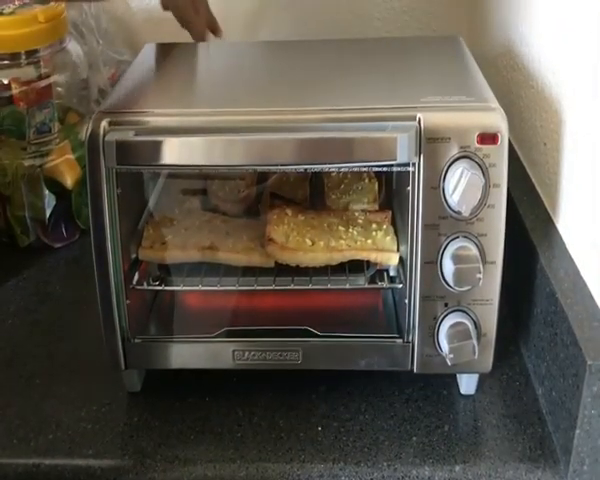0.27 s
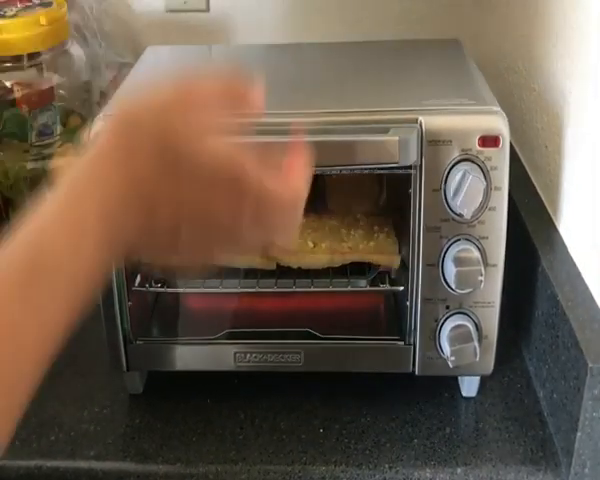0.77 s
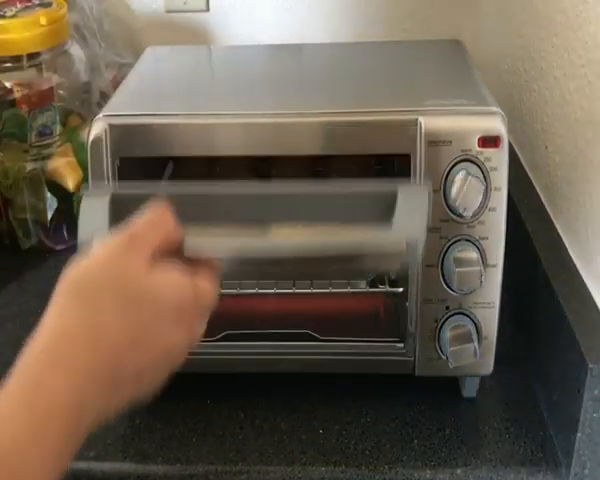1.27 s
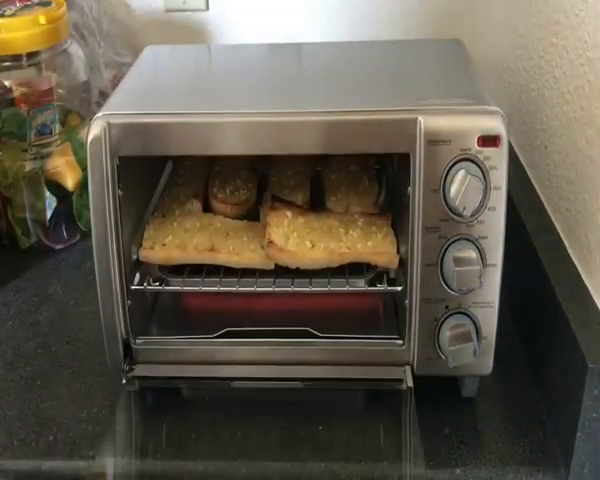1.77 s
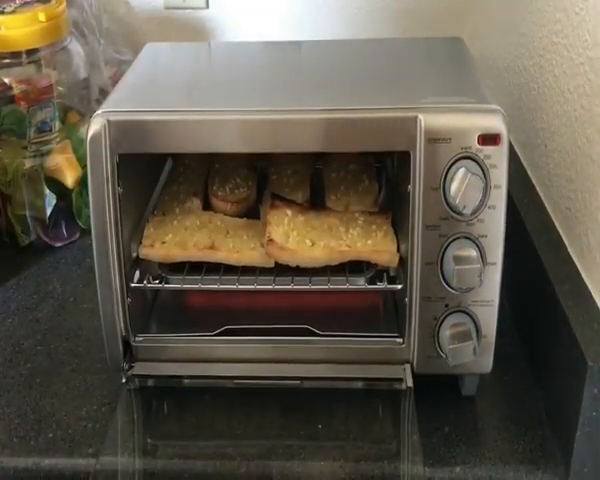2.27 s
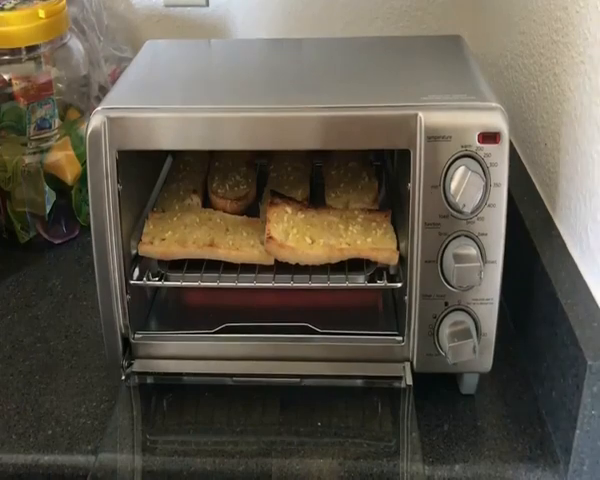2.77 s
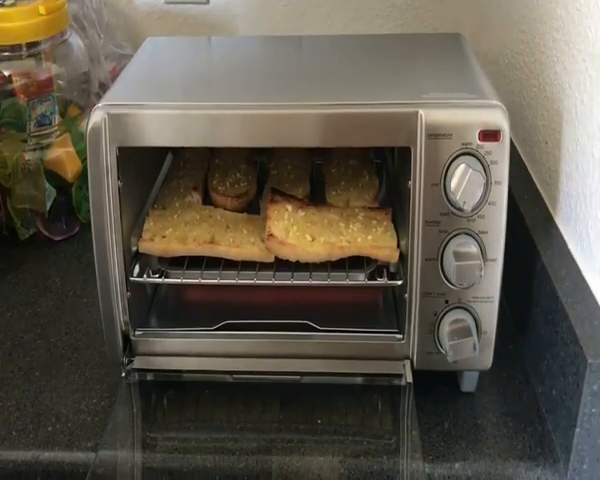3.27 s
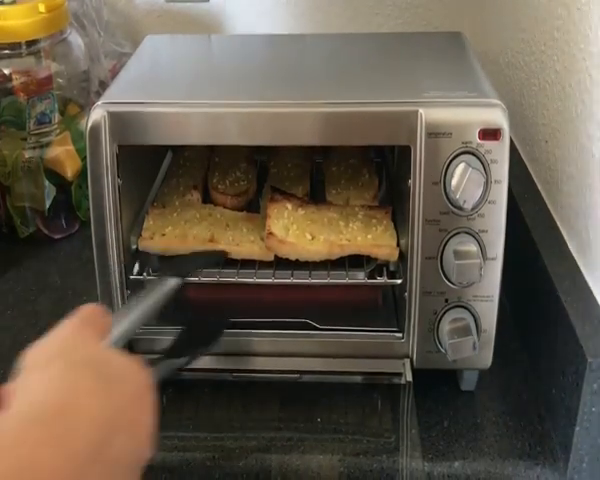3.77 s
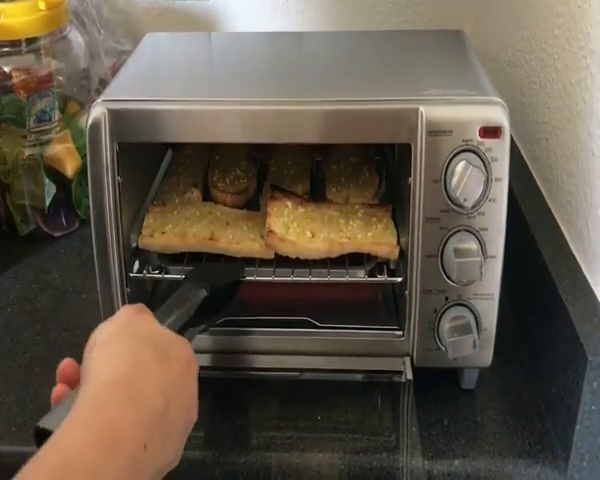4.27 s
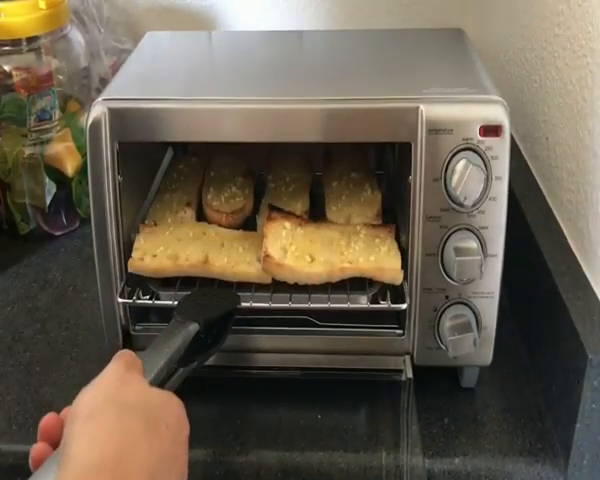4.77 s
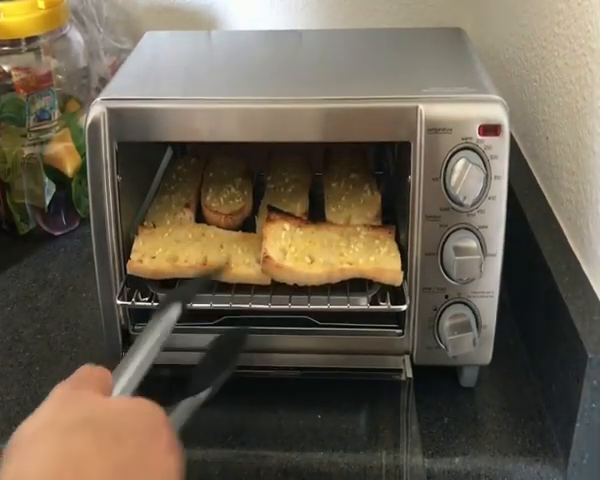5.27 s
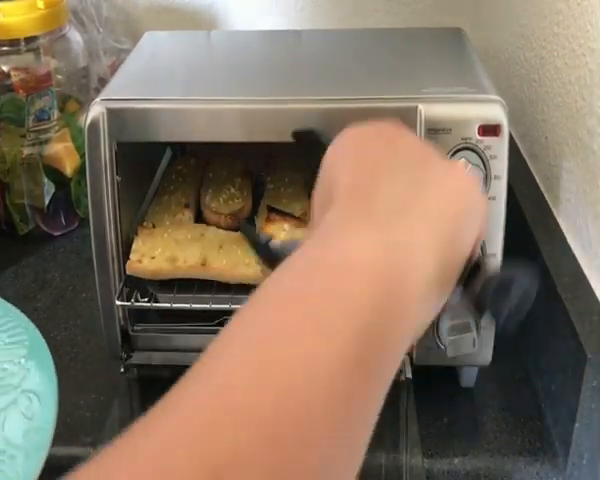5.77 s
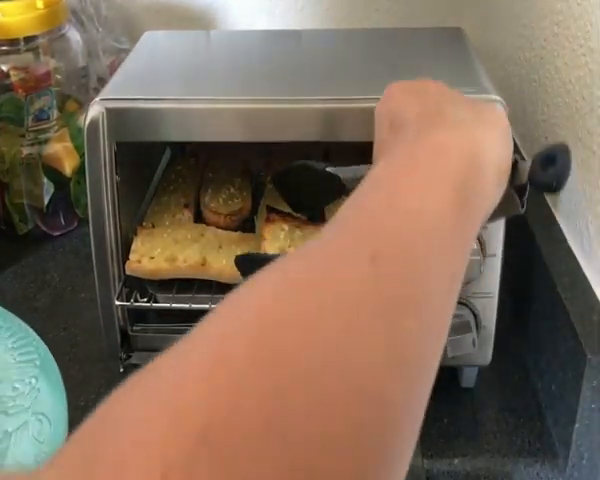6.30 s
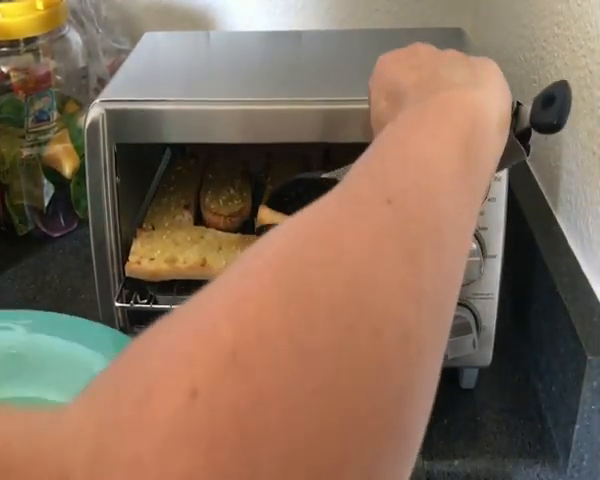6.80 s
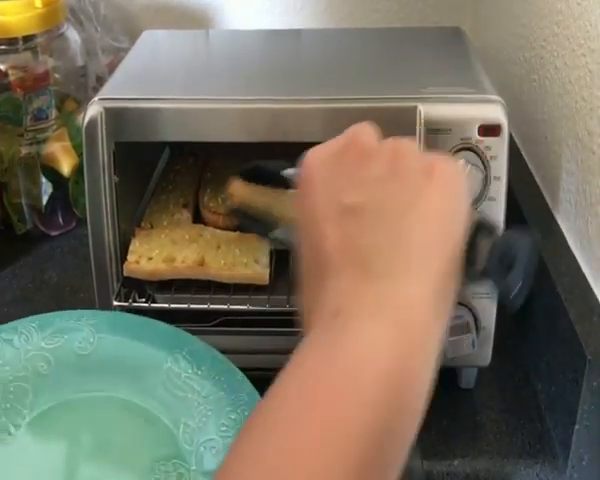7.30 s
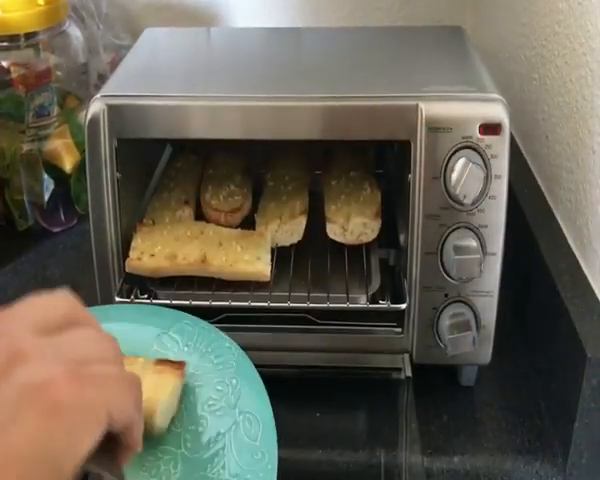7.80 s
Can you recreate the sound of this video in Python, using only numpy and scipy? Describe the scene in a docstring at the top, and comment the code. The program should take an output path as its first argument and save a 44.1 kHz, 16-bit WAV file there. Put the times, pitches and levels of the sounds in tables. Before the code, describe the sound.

A small kitchen is heard closely, almost mono, with a short room tail and a steady low motor hum under faint hiss. At 0-0.15 s there are light metallic clicks and a soft low counter bump. At about 0.57-0.64 s a hard hollow object drops on the counter: a very loud woody clack with rapid bounces, and a faint last tap at 0.84. Faint handling follows; from 1.85 to 2.25 the metal oven door hits its stops, clanking sharply at 1.9 and again at 2.05, with juddering rattle. Around 2.8-2.95 a dish grates off its stack, then knocks dully at 3.13. Small dry ticks come at 3.4-3.8. At 4.35-5.0 tongs click, grip and drag the ringing wire rack. At 6.6-6.9 crust scrapes with metal clicks, then faint ticks. Near 7.8 and 7.98 the plate clinks, the second brighter and louder, with light taps and a faint slide after.

```python
"""Quiet kitchen: a hard object drops on the counter; an oven door swings down and bounces on its stops.
A dish is dragged off its stack; tongs grip and drag a wire rack, scrape toast off it and tap a glazed plate.
Blows are noise bursts, slides are gritty noise under pressure curves; both drive banks of resonances.
Plate and gripped rack are sums of decaying sines. A decaying-noise room answers; an appliance drones."""
import sys
import numpy as np
from scipy import signal
from scipy.fft import rfft, irfft, next_fast_len
from scipy.io import wavfile

SR = 44100
rng = np.random.default_rng(int(sys.argv[2]) if len(sys.argv) > 2 else 0)


def natural_amplitude(level_db):
    """Convert a level in decibels to a linear amplitude factor, elementwise."""
    exponent = np.asarray(level_db, float) / 20
    return 10 ** exponent


def store_pcm(level_fs):
    """Save levels as 16-bit WAV."""
    pcm = np.round(np.clip(level_fs, -1, 1) * 32767).astype(np.int16)
    wavfile.write(sys.argv[1], SR, np.atleast_2d(pcm).T)


N = 354828


def unit(x):
    """Scales to rms 1."""
    return x / np.sqrt(np.mean(x ** 2) + 1e-20)


def along(points, hz):
    """Interpolates (f/Hz, value) points on a log-frequency axis."""
    f, value = np.transpose(points)
    return np.interp(np.log(hz + 1), np.log(f + 1), value)


def curves(rows):
    """One gain per sample for each dB column; -150 dB outside the rows."""
    s, *columns = np.transpose(rows)
    t = np.arange(N) / SR
    return np.array([natural_amplitude(np.interp(t, s, db, -150, -150)) for db in columns])


def filtered(x, response):
    """Multiplies the spectrum of x by a function of frequency."""
    size = next_fast_len(N + SR // 2)
    spectrum = rfft(x, size) * response(np.fft.rfftfreq(size, 1 / SR))
    return irfft(spectrum, size)[..., :N]


def passed(x, hz, kind, order=4):
    """Butterworth low- or high-pass."""
    return signal.sosfilt(signal.butter(order, hz, kind, fs=SR, output="sos"), x)


def coloured(spectrum):
    """Noise of rms 1 with a given spectrum."""
    return unit(filtered(rng.standard_normal(N), lambda hz: natural_amplitude(along(spectrum, hz))))


def resonate(x, peaks):
    """Parallel resonances of alternating sign, scaled so that white noise about keeps its level."""
    out, power = 0, 0
    for k, (hz, width_hz, db) in enumerate(peaks):
        b, a = signal.iirpeak(hz, hz / width_hz, SR)
        out = out + (-1) ** k * natural_amplitude(db) * signal.lfilter(b, a, x)
        power += natural_amplitude(db) ** 2 * np.pi * width_hz / SR
    return out / np.sqrt(power)


def add(track, s, sound):
    """Mixes a sound into the track at s seconds."""
    part = track[..., round(s * SR):][..., :sound.shape[-1]]
    part += sound[..., :part.shape[-1]]


def ring(modes, top_hz, scatter_db):
    """Decaying modes, peak 1: soft blows rise slowly and miss high modes, hard ones miss low modes."""
    hz, db, t60_s = np.transpose(modes)[:, :, None]
    t = np.arange(SR // 3) / SR
    missed_db = 10 * np.log10(1 + (hz / top_hz) ** 24 + (top_hz / hz / 5) ** 2)
    db = db + scatter_db * rng.standard_normal(db.shape) - missed_db
    decay = natural_amplitude(db - 60 * t / np.maximum(t60_s, .01))
    x = np.sum(decay * np.sin(2 * np.pi * hz * t), axis=0)
    x = x * (1 - np.exp(-t * top_hz))
    return x / abs(x).max()


def burst(t60_s, crack):
    """First touch as one push, a short crackle and a rattle that dies after it."""
    t = np.arange(SR // 4) / SR
    rattle = natural_amplitude(-60 * t / max(t60_s, .005))
    crackle = crack * natural_amplitude(-60 * t / 0.0053)
    x = rng.standard_normal(len(t)) * (rattle + crackle)
    x[0] = 6 * crack
    return x


def metal_blow(db):
    """Metal blow: lighter ones start softer and rattle longer; the level itself is set by the caller."""
    t60_at_0db_s, t60_s_per_db = .06, .0005
    crisp_db, softens_per_db, rise_s = -24, .06, .0015
    blow = burst(t60_at_0db_s - t60_s_per_db * db, crack=0.95)
    t = np.arange(len(blow)) / SR
    softness = np.clip(softens_per_db * (crisp_db - db), 0, .7)
    return blow * (1 - softness * np.exp(-t / rise_s))


def strokes(rows, mix):
    """Pressure rises to its hardest moment and lets go; returns drives of bars, wires, box and fine hiss."""
    edge_db, fade_s = 17, .04  # start and end under the hardest moment; fade outside the stroke
    treble_grows = 1.3  # treble dB per pressure dB
    t, out = np.arange(0, N, 32) / SR, 0
    box_db, hiss_db = mix
    for start, hardest, end, db, bright_db in rows:
        times = [start - fade_s, start, hardest, end, end + fade_s]
        shape_db = np.interp(t, times, edge_db * np.array([-4, -1, 0, -1, -4]))
        treble_db = bright_db + treble_grows * shape_db
        drives_db = np.array([shape_db, treble_db, box_db + shape_db, hiss_db + treble_db])
        out = out + natural_amplitude(db + drives_db)
    return out.repeat(32, axis=1)[:, :N]


def catching(hold, power):
    """Random strength held for a number of samples: sliding catches and lets go."""
    return rng.exponential(size=N // hold + 1).repeat(hold)[:N] ** power


# landing and bounces [t/s, level/dB, rattle re landing/dB]
LANDINGS = [(.568, -23, -22), (.584, -1, -39), (.593, -10, -30), (.601, -8, -13.5), (.615, -11.5, -28),
            (.638, -18, -23), (0.839, -33, -35)]
# hollow body [f/Hz, width/Hz, level/dB]
DROPPED_BODY = [(132, 18, -3), (258, 26, -3), (297, 28, -3), (360, 26, -4), (551.3, 40, -4),
                (675, 60, -1.5), (870, 64, 2), (975, 70, -2), (1050, 70, -1), (1300, 120, 1), (1387, 40, 9),
                (1620, 200, -4), (1880, 100, -4), (2080, 140, -9)]


def drop():
    """Each landing shakes the hollow body: hard touch, duller chatter, loose parts rattling on top."""
    chatter_t60_at_0db_s, chatter_s_per_db = .05, .0015  # softer landings chatter longer
    touch, chatter, rattle = np.zeros((3, N))
    for s, db, rattle_db in LANDINGS:
        chatter_t60_s = chatter_t60_at_0db_s - chatter_s_per_db * db
        add(touch, s, natural_amplitude(db + 3.5) * burst(0.0089, crack=.6))
        add(chatter, s, natural_amplitude(db - 12.5) * burst(chatter_t60_s, crack=0))
        add(rattle, s, natural_amplitude(db + rattle_db + 3.5) * burst(0.055, crack=.6))
    body = resonate(touch + passed(chatter, 1300, "low", order=1), DROPPED_BODY)
    loose = resonate(rattle, [(2900, 1200, -2), (7000, 4000, -11), (13300, 2600, -17)])
    return passed(body, 2600, "low", order=3) + passed(loose, 1500, "high")


# door on its stops [t/s, level/dB, tick re level/dB, thump re level/dB]
STOP_HITS = [(1.852, -47, -2, 5), (1.89, -33, -5, -8), (1.8953, -15, -7, -10), (1.906, -26, -4, -3),
             (1.9556, -39, 9, 8), (2.023, -53, 12, -6), (2.0479, -20, -8, -7), (2.1181, -44, 10, -8),
             (2.15, -32, -15, 0), (2.2192, -50, 1.5, 12.5)]


def door_stops(force, door):
    """Door bounces on its stops: each blow drives door frame, wires and box."""
    for s, db, tick_db, thump_db in STOP_HITS:
        blow = metal_blow(db)
        add(door, s, natural_amplitude(db - 7.5) * blow)
        add(force[1:], s, natural_amplitude([[db + tick_db - 4], [db + thump_db - 3.5]]) * blow)


# handling, tongs, rack [t/s, level/dB, tick re level/dB, thump re level/dB, ping f/Hz]
METAL_CONTACTS = [(0.0638, -42, -10, -3, 2480), (0.0765, -39.5, -14, -1, 2250),
                  (0.0957, -33, -12, -19, 3300), (1.5966, -46.5, -11, -3, 2920),
                  (1.6476, -42.5, -31.5, -8, 2670), (1.731, -44, -12, -21.5, 2190),
                  (4.3466, -48, -5.5, -1, 9000), (4.369, -34, -10, -8, 2800), (4.3782, -27, -11, -5, 3100),
                  (4.4094, -42, 1.5, 4, 2730), (4.9568, -50, -10, -8, 4000),
                  (6.6859, -36, -12.5, -11, 3100), (6.7032, -31, -10, -18, 3050), (6.7325, -38, 4, 8, 2520),
                  (6.748, -34, -6, 4, 2780)]


def metal_contacts(force, pings):
    """Metal on metal drives shell, wires and box; the touched spot has its own pitch."""
    for s, db, tick_db, thump_db, hz in METAL_CONTACTS:
        blow = metal_blow(db)
        add(force, s, natural_amplitude([[db - 6], [db + tick_db - 2.5], [db + thump_db - 3.5]]) * blow)
        add(pings, s, natural_amplitude(db - 8) * resonate(blow, [(hz, 400, 0)]))


# hot metal and crust [t/s, level/dB, treble re level/dB, ping f/Hz]
DRY_TICKS = [(3.418, -54, 4, 8500), (3.7062, -44, -9, 3050), (3.767, -44, -4.5, 3260),
             (6.8824, -48, 4, 5400), (6.9679, -49, 1.5, 5000), (7.0299, -46, -6.5, 3090),
             (7.1566, -43, -4, 3220)]


def dry_ticks(force, pings):
    """Dry ticks of hot metal and crust: short bursts into shell and wires, plus a ping."""
    for s, db, treble_db, hz in DRY_TICKS:
        blow = burst(.03, crack=.6)
        add(force[:2], s, natural_amplitude([[db - 11], [db + treble_db - 4]]) * blow)
        add(pings, s, natural_amplitude(db - 8.5) * resonate(blow, [(hz, 500, 0)]))


# tongs close on the rack [t/s, peak/dB]
TONG_GRIPS = [(4.379, -27.5)]
# gripped rack [f/Hz, level/dB, t60/s]
RACK_MODES = [(1190, -1, .12), (1453, -3, 0.09), (2729, -4, .07), (3080, 4, .05)]


def grips(pings):
    """The gripped rack rings as decaying modes."""
    for s, db in TONG_GRIPS:
        add(pings, s, natural_amplitude(db) * ring(RACK_MODES, top_hz=5000, scatter_db=1.5))


# strokes, all [start t/s, hardest t/s, end t/s, pressure level/dB, wires re bars/dB]
# things handled on the counter
HAND_STROKES = [(0, .003, .045, -41, -14), (.02, .075, .15, -53, -16), (.7, .93, 1.1, -59, -5)]
# door swings down and judders
DOOR_STROKES = [(1.28, 1.42, 1.75, -58, -11), (1.5, 1.7, 1.95, -59, -5), (1.865, 1.896, 2.02, -46, 3),
                (1.9, 1.97, 2.22, -49, -6), (2.0, 2.13, 2.27, -55, 4)]
# dish slides off its stack
DISH_OFF_STACK = [(2.76, 2.86, 2.98, -56, 3)]
# tongs on the rack
TONG_STROKES = [(3.35, 3.42, 3.49, -63, -1.5), (4.355, 4.385, 4.48, -42, -12), (4.42, 4.51, 4.62, -56, -.6),
                (4.55, 4.66, 5.03, -45.5, -13), (6.725, 6.74, 6.83, -50, .6)]
# crust over wires and plate; from 6.85 s a faint bright hiss
CRUST_AND_HISS = [(6.62, 6.65, 6.7, -58, -6), (6.675, 6.7, 6.75, -45, -15), (6.71, 6.765, 6.88, -42, -3),
                  (6.85, 6.95, 7.3, -63, 1.5), (7.89, 7.96, 8.2, -58, 7)]


def sliding():
    """Gritty noise under pressure curves: four drives, and the share of crust and faint hiss in the bars."""
    # mix: (box re bars/dB, fine hiss re wires/dB)
    pressure = strokes(HAND_STROKES, (5, -6)) + strokes(DOOR_STROKES, (2.5, -6))
    pressure = pressure + strokes(DISH_OFF_STACK, (-1.5, -8)) + strokes(TONG_STROKES, (-1.5, 4))
    crust = strokes(CRUST_AND_HISS, (5, -7))
    total = pressure + crust
    drives = total * unit(catching(128, 0.38) * rng.standard_normal((4, N)))
    return drives, crust[0] / total[0]


# resonators, all [f/Hz, width/Hz, level/dB]
# oven shell
SHELL = [(1350, 490, -12), (2700, 800, -1), (3250, 600, -2), (4400, 1300, -7)]
# rubbed bars
RUBBED_BARS = [(740, 200, -1), (1420, 260, 3), (1800, 260, 2), (2520, 380, 0), (3100, 700, -4),
               (4300, 1600, -11)]
# door frame
FRAME = [(1270, 300, -9), (1950, 500, -11), (2380, 140, -2), (2570, 160, -2), (2760, 200, -2),
         (3310, 300, -2), (3800, 450, -6), (4330, 260, -5), (4570, 220, -7), (5440, 550, -5),
         (6090, 400, -5)]
# rack and tongs
WIRE_BANDS = [(6000, 1900, 20.5), (9200, 2600, 17.5), (12300, 4000, 11)]
# finest roughness of the sliding faces
FINE_GRIT = [(11430, 4300, -1.5), (13900, 3000, -0.5)]
# oven box and counter
BOX = [(151, 60, -0.5), (262, 97, 4.5), (398.4, 68, 1.5), (671, 250, -3)]


def oven():
    """Blows and sliding shake shell, wires and hollow box, each by its own amount."""
    force, pings, door = np.zeros((3, N)), np.zeros(N), np.zeros(N)  # force: shell, wires, box
    door_stops(force, door)
    metal_contacts(force, pings)
    dry_ticks(force, pings)
    grips(pings)
    (scrape, fizz, drag, hiss), crusty = sliding()
    # crust rasps the shell, the other strokes drag the bars
    shell = resonate(force[0] + crusty * scrape, SHELL)
    shell = shell + resonate((1 - crusty) * scrape, RUBBED_BARS) + resonate(door, FRAME)
    wires = resonate(force[1] + fizz, WIRE_BANDS)
    crumbs = catching(64, 1.3)  # single specks snap in the finest hiss
    fine = resonate(hiss * unit(1 + .35 * crumbs) + natural_amplitude(-13) * door, FINE_GRIT)
    box = resonate(force[2] + drag, BOX)
    out = pings + passed(shell, 600, "high") + passed(wires, 4200, "high", order=3)
    return out + passed(fine, 8500, "high") + passed(box, 1200, "low", order=2)


# drag stroke [start t/s, hardest t/s, end t/s, pressure level/dB, brightness/dB (not used here)]
DISH_STROKES = [(2.81, 2.868, 2.93, -42, 0)]
# catches [t/s, level/dB]
DISH_CATCHES = [(2.798, -52), (2.829, -45), (2.859, -41), (2.866, -38), (2.873, -39)]
# dish resonances [f/Hz, width/Hz, level/dB]
DISH_BODY = [(610, 50, -1), (760, 45, -1), (1055, 35, -1), (1490, 90, -11), (1730, 160, -11),
             (2330, 90, -10), (2930, 90, -13), (3500, 500, -17), (4540, 220, -15), (5310, 110, -13),
             (5950, 300, -18), (7300, 1500, -22)]


def dish():
    """Rough glaze on glaze: gritty drag with a few catches, all ringing in the dish."""
    force = strokes(DISH_STROKES, (0, 0))[0] * unit(catching(96, .55) * rng.standard_normal(N))
    for s, db in DISH_CATCHES:
        add(force, s, natural_amplitude(db) * burst(.02, crack=.6))
    return resonate(force, DISH_BODY)


# plate taps [t/s, ring peak/dB, top f of the blow/Hz]
PLATE_TAPS = [(3.0807, -43, 16000), (3.126, -29, 1100), (7.811, -40, 13000), (7.91, -46, 4000),
              (7.9775, -24, 9500), (8.008, -45, 6000), (8.038, -44, 9000)]
# glazed plate [f/Hz, level/dB, t60/s]
PLATE_MODES = [(219, 4, 0.11), (395, 1, 0.13), (755, -2, 0.14), (1050, 0, 0.14), (1500, 6, 0.04),
               (1850, 2, 0.06), (2320, -4, 0.06), (2920, -3, 0.045), (3640, 1, 0.035), (4600, -5, 0.03),
               (5600, -5, 0.03), (6100, -4, 0.025), (8300, -7, 0.025)]


def plate():
    """Glazed stoneware picked up, set down, touched by tongs: dry clack and short modal ring."""
    out = np.zeros(N)
    for s, db, top_hz in PLATE_TAPS:
        add(out, s, natural_amplitude(db) * ring(PLATE_MODES, top_hz, scatter_db=1.5))
        add(out, s, natural_amplitude(db - 5) * passed(burst(0.03, crack=.6), top_hz / 2, "low"))
    return out


# counter nudged [t/s, peak/dB, f/Hz, t60/s]
COUNTER_BUMPS = [(0.083, -33.5, 72.1, 0.1)]


def counter():
    """Nudged counter: each bump is one low decaying mode."""
    out = np.zeros(N)
    for s, db, hz, t60_s in COUNTER_BUMPS:
        add(out, s, natural_amplitude(db) * ring([(hz, 0, t60_s)], top_hz=150, scatter_db=0))
    return out


# room decay [f/Hz, t60/s]
ROOM_DECAY = [(150, 0.33), (1000, 0.25), (4000, 0.21), (12000, 0.13)]


def kitchen(x):
    """Two room tails, each frequency dying at its own speed; fresh tails every quarter second."""
    out, step = np.zeros((2, N)), SR // 4
    for start in range(0, N, step):
        hz, t, z = signal.stft(rng.standard_normal((2, SR // 2)), SR, nperseg=256)
        decay = natural_amplitude(-60 * t / along(ROOM_DECAY, hz)[:, None])
        tail = signal.istft(z * decay, SR, nperseg=256)[1]
        tail = tail / np.linalg.norm(tail[0])
        wet = signal.fftconvolve(x[None, start:start + step], tail, axes=1)
        add(out, start / SR + .004, wet)
    return out


# background levels [t/s, drone level/dB, hiss level/dB]
AIR_LEVELS = [(0, -46, -67.5), (.5, -46.5, -65), (2.4, -44, -63.5), (5.2, -45, -65), (8.05, -45.5, -64)]
# motor hum [f/Hz, width/Hz, level/dB]
HUM_PEAKS = [(59.2, 4.1, 1), (109.2, 4.67, 2), (187.4, 12.1, -0.5), (230.6, 10.4, -5), (304, 12, 0.6),
             (592, 26.2, -9.5), (880.4, 39, -14.5), (1338, 80, -26.5)]
# thin motor tone [f/Hz, width/Hz, level/dB]
WHINE_PEAK = [(5580, 25, 0)]
# rumble spectrum [f/Hz, density/dB per Hz]
RUMBLE_SPECTRUM = [(20, -42), (40, -18.5), (60, -5), (200, -3.5), (450, -13.5), (750, -9), (1100, -30.5),
                   (2200, -33.5), (4000, -60)]
# hiss spectrum [f/Hz, density/dB per Hz]
HISS_SPECTRUM = [(700, -33), (1200, -7), (1800, -6), (3000, -11.5), (4800, -14), (5800, -12), (8000, -18),
                 (10400, -21.5), (12500, -18.5), (15500, -25)]


def background():
    """Motor hums through ducts and room modes: resonated noise, with rumble, air hiss and a thin whine."""
    drone, hiss = curves(AIR_LEVELS)
    hum = unit(passed(resonate(rng.standard_normal(N), HUM_PEAKS), 42, "high"))
    whine = resonate(rng.standard_normal(N), WHINE_PEAK)
    low = unit(hum + natural_amplitude(-10) * coloured(RUMBLE_SPECTRUM))
    high = coloured(HISS_SPECTRUM) + natural_amplitude(-28.5) * whine
    return drone * low + hiss * high


def scene():
    """Sources, room and background in the middle; the two channels differ only by a trace of treble."""
    near = drop() + oven() + dish() + plate() + counter()
    wet, other = kitchen(near)
    mid = near + natural_amplitude(-8.5) * wet + background()
    side = natural_amplitude(-25) * passed(other + natural_amplitude(-57) * rng.standard_normal(N), 2210, "high", order=3)
    return np.array([mid + side, mid - side])


def top_cut(x):
    """Nothing passes above the cut-off."""
    return signal.sosfilt(signal.butter(12, 16480, fs=SR, output="sos"), x)


def record(dry):
    """Clips at full scale, then removes everything from the band limit up."""
    top_hz = 15800
    mix = filtered(np.clip(dry, -1, 1), lambda hz: hz < top_hz)
    return top_cut(mix)


dry = scene()
out = record(dry)
store_pcm(out)
```